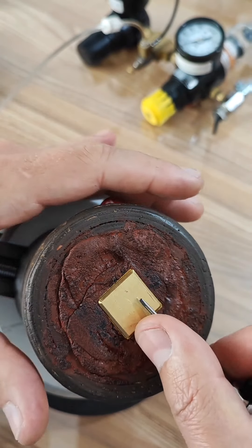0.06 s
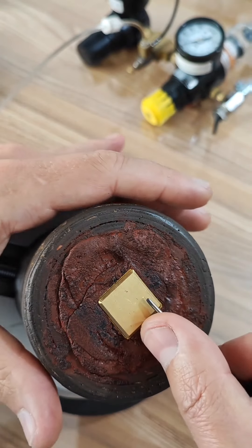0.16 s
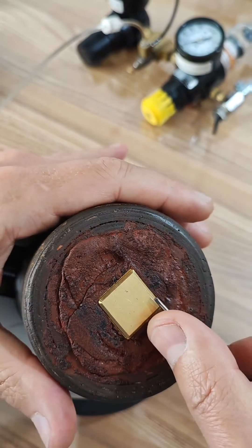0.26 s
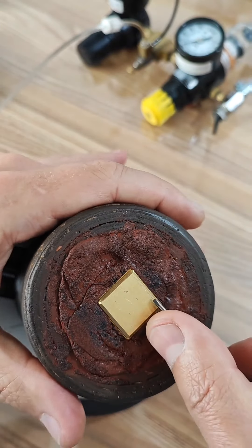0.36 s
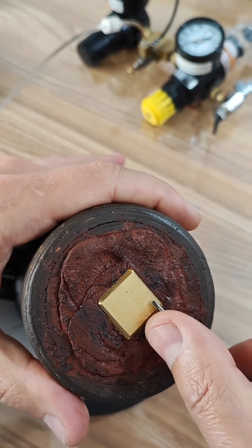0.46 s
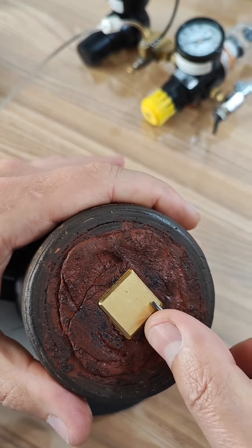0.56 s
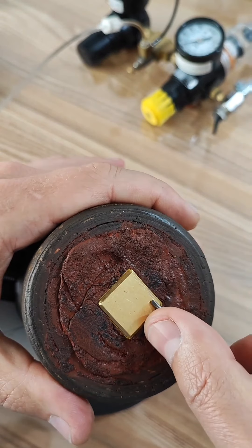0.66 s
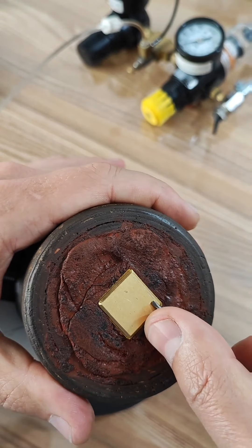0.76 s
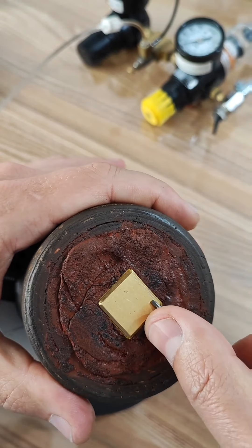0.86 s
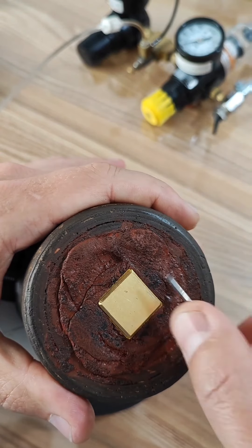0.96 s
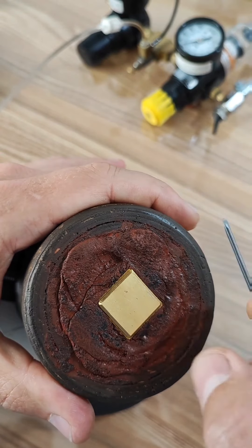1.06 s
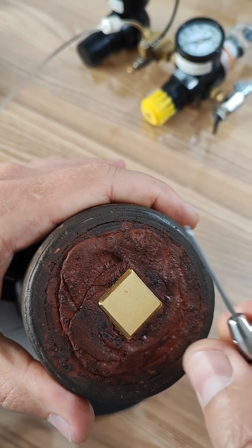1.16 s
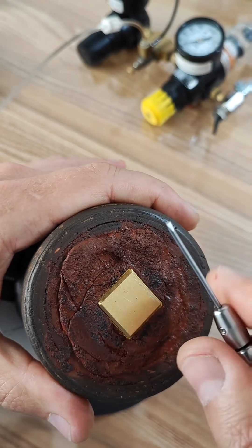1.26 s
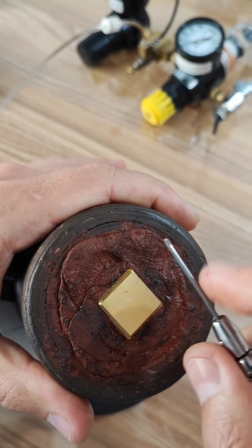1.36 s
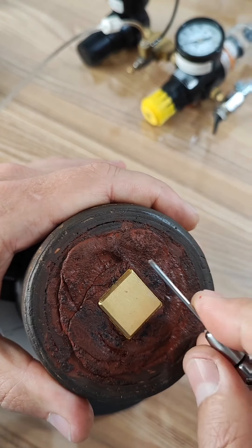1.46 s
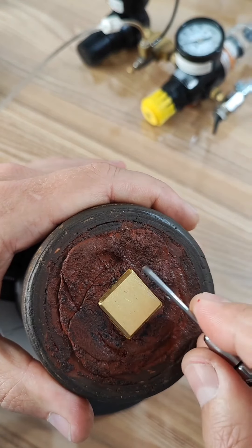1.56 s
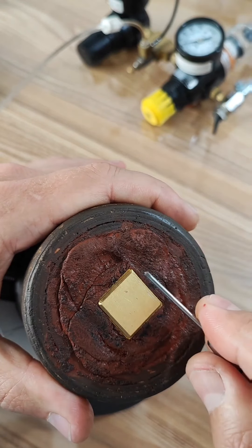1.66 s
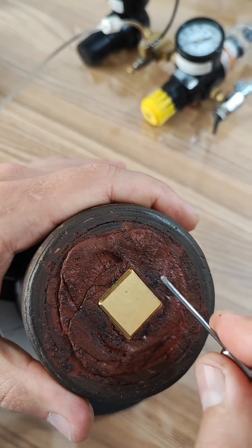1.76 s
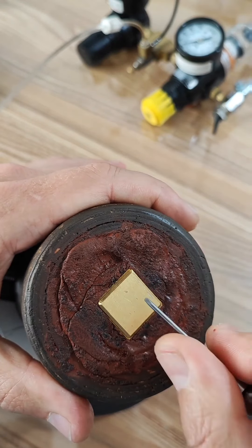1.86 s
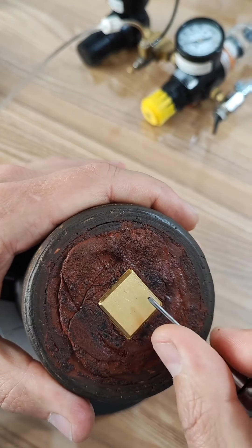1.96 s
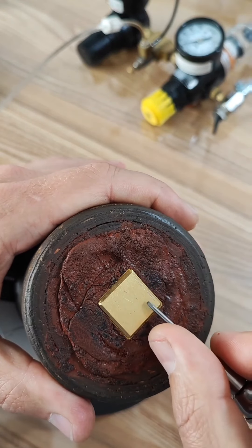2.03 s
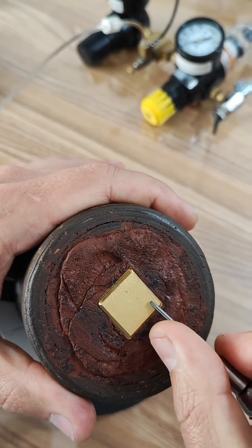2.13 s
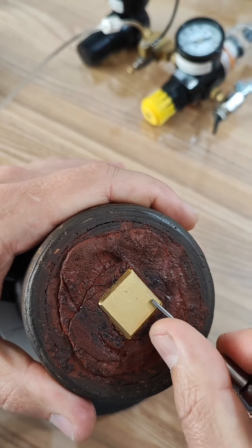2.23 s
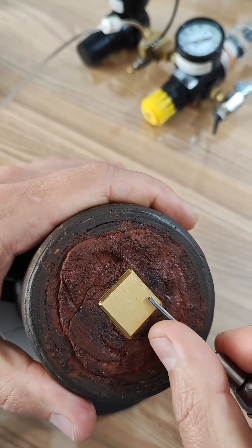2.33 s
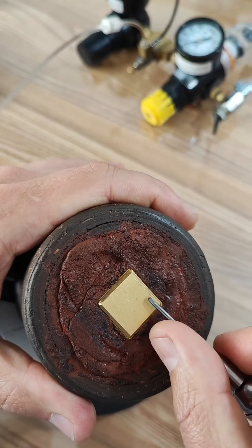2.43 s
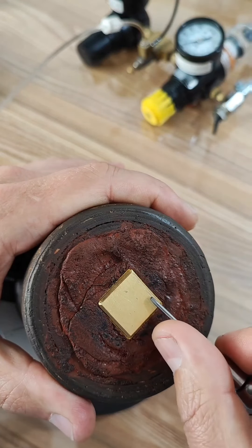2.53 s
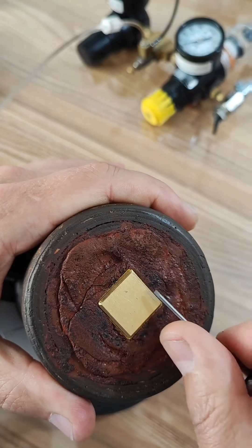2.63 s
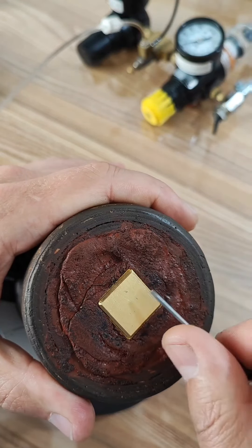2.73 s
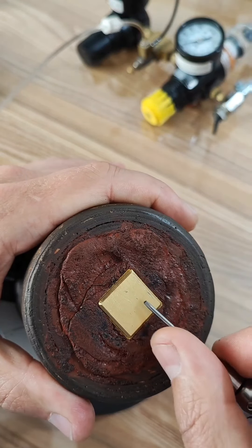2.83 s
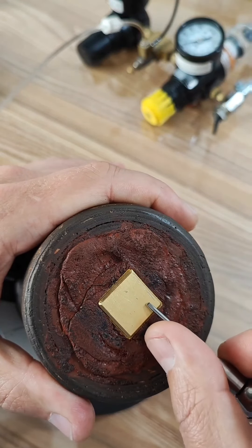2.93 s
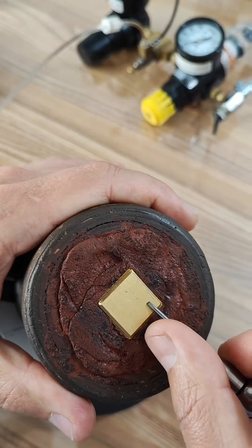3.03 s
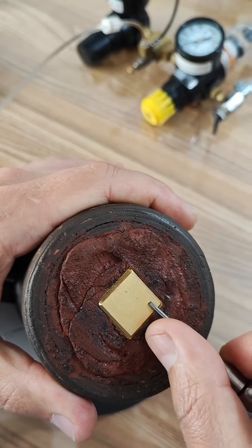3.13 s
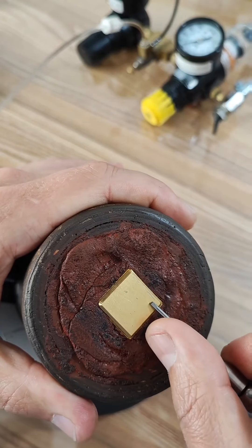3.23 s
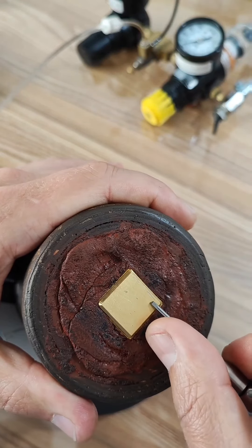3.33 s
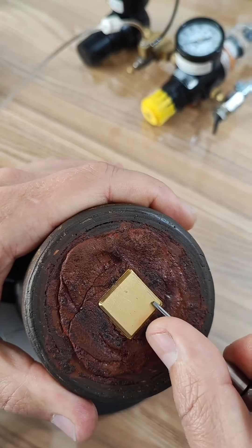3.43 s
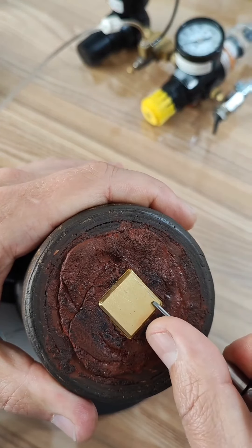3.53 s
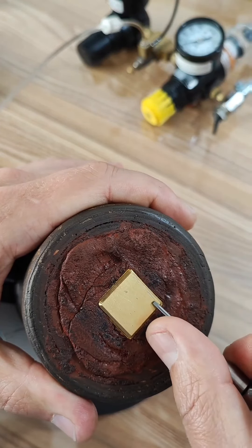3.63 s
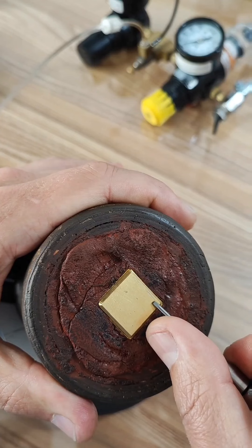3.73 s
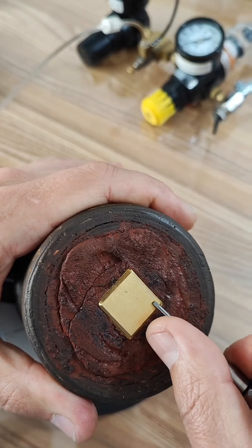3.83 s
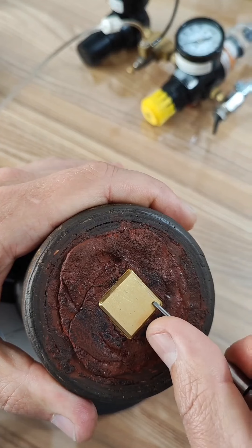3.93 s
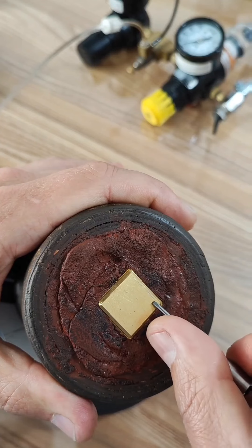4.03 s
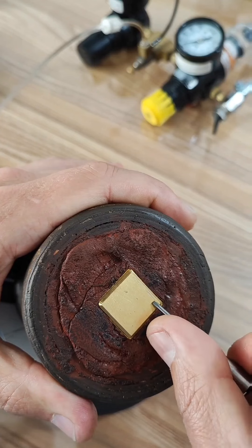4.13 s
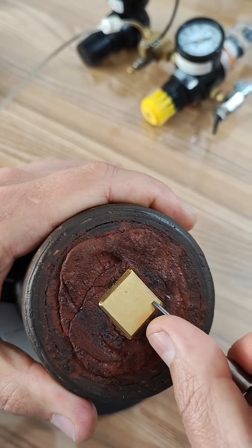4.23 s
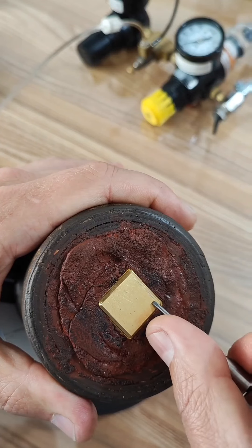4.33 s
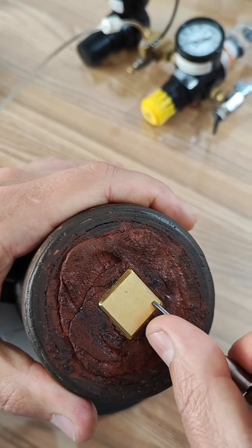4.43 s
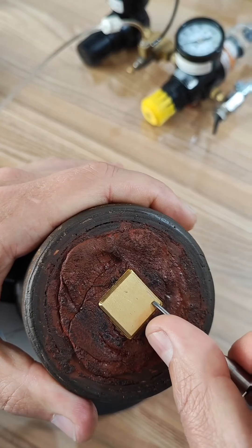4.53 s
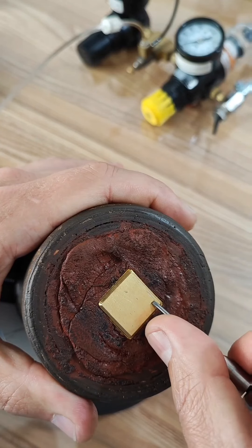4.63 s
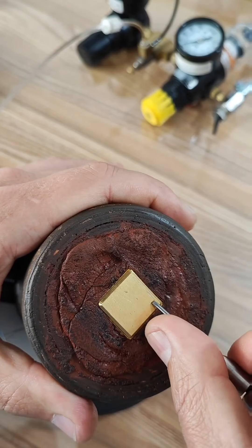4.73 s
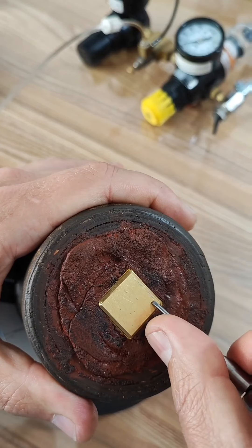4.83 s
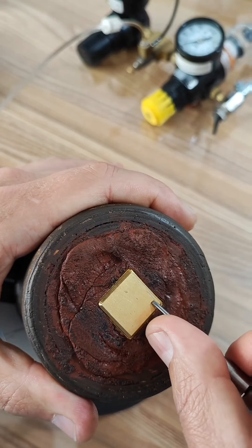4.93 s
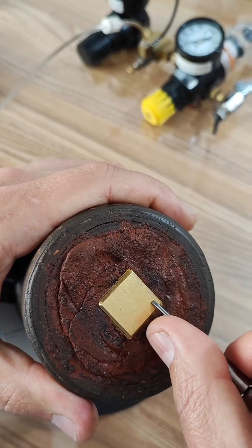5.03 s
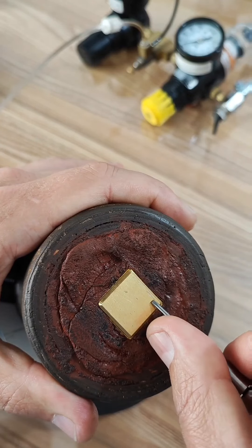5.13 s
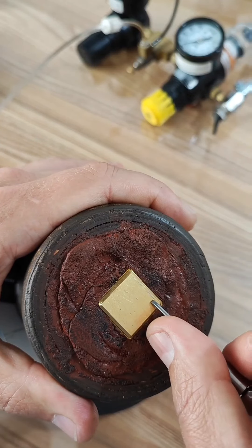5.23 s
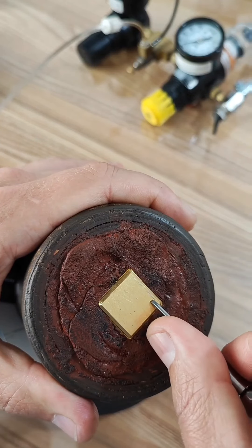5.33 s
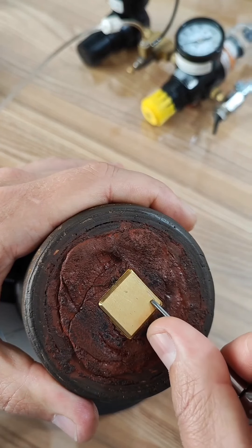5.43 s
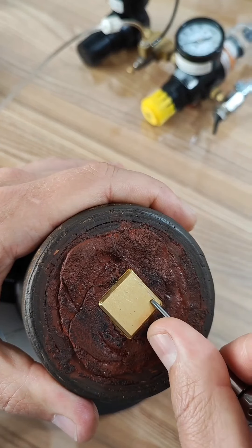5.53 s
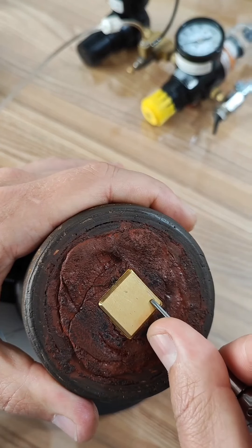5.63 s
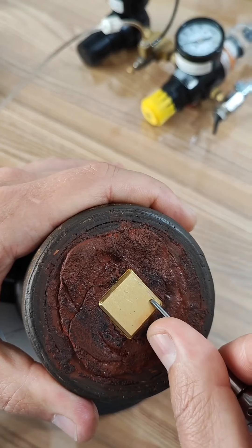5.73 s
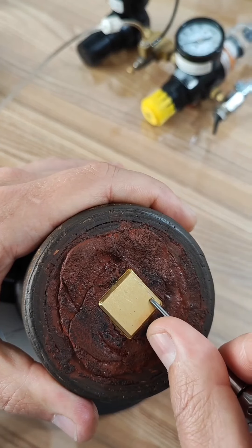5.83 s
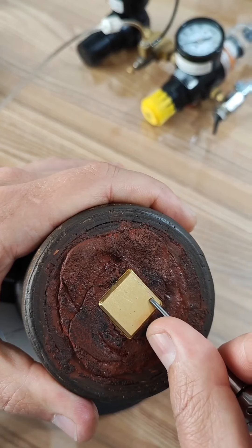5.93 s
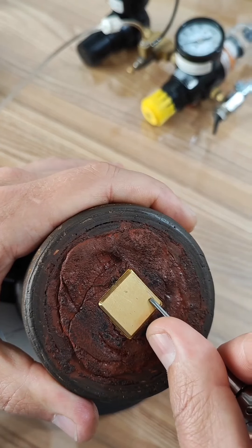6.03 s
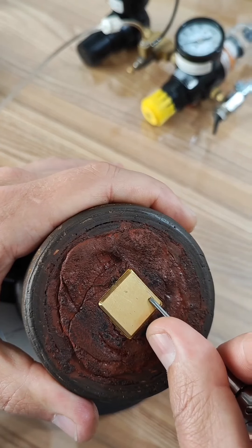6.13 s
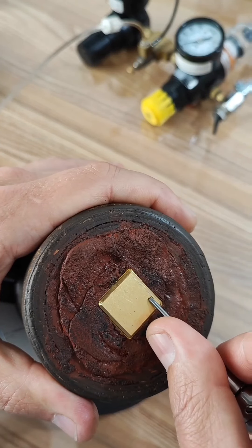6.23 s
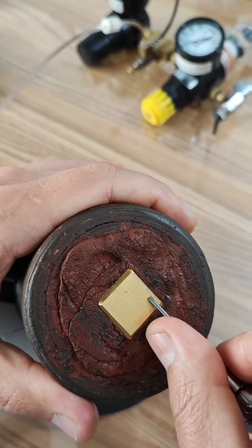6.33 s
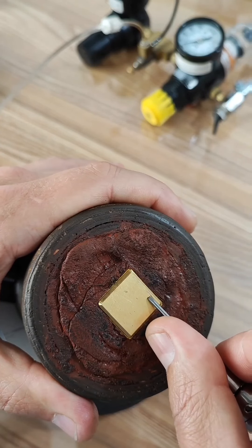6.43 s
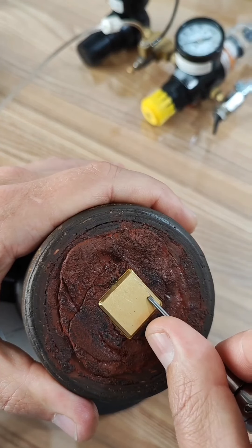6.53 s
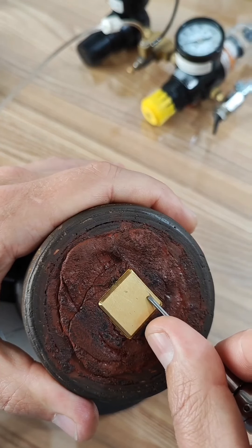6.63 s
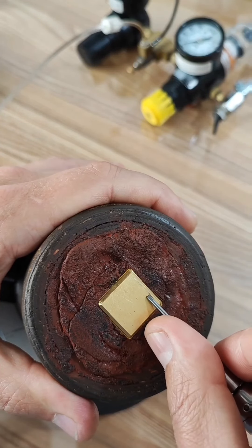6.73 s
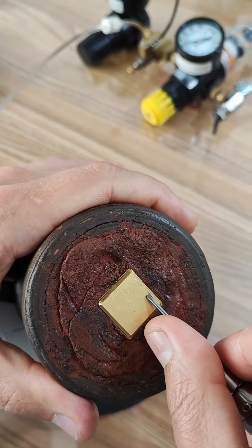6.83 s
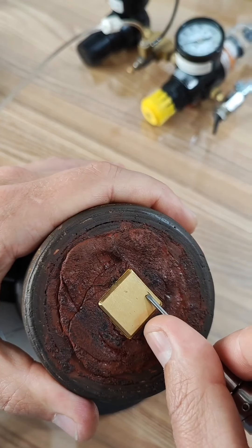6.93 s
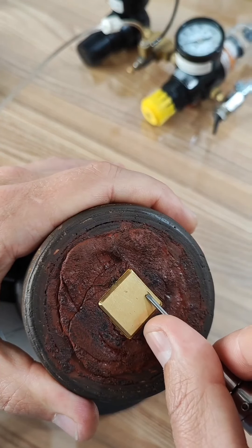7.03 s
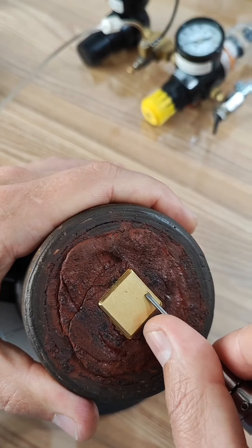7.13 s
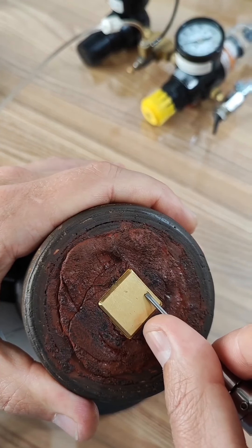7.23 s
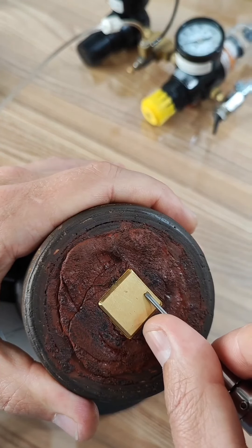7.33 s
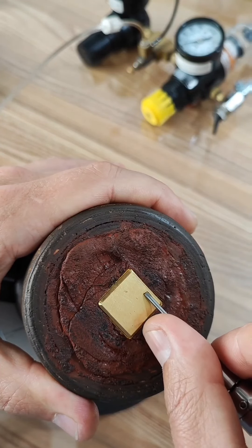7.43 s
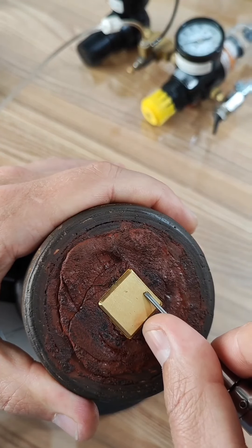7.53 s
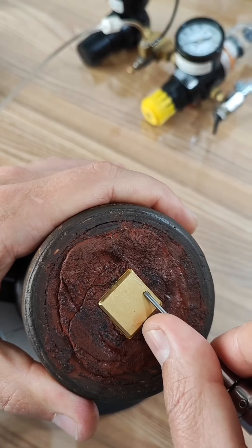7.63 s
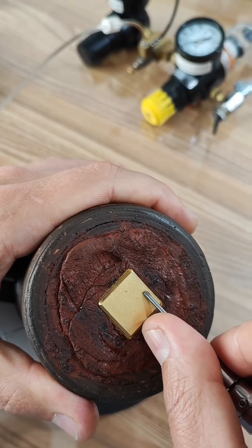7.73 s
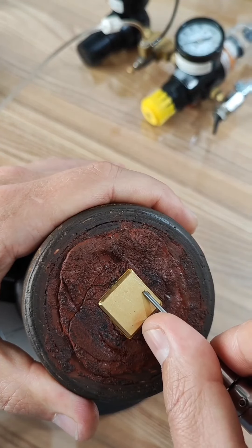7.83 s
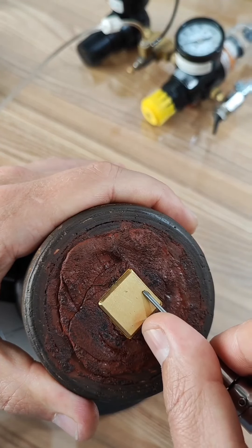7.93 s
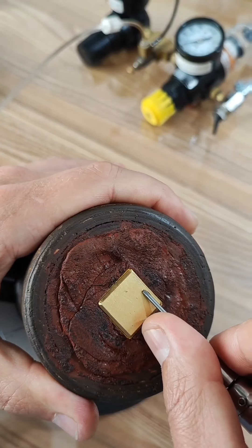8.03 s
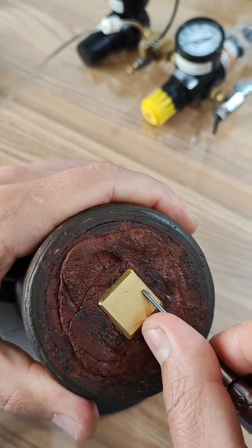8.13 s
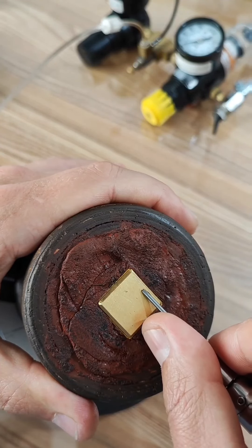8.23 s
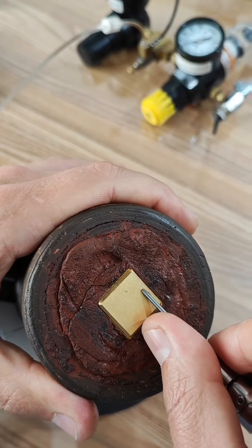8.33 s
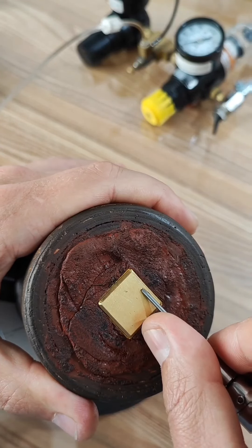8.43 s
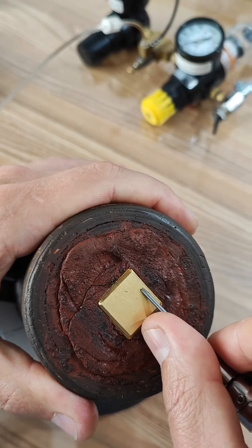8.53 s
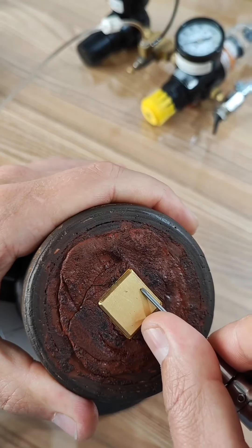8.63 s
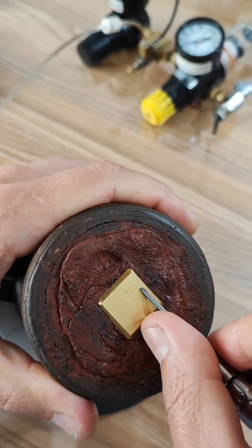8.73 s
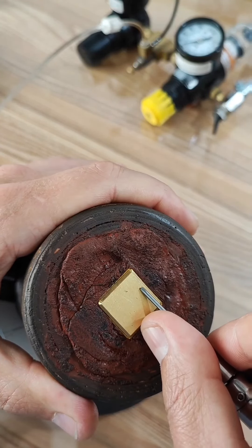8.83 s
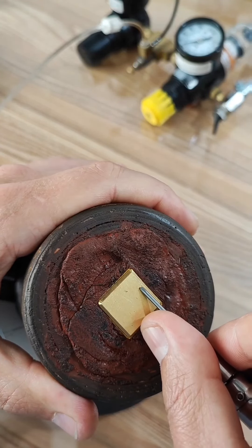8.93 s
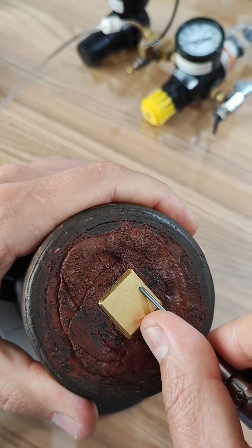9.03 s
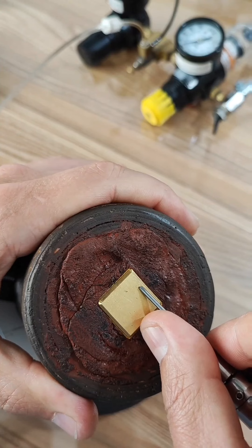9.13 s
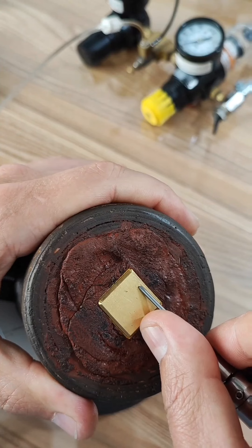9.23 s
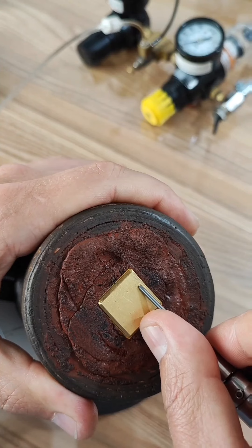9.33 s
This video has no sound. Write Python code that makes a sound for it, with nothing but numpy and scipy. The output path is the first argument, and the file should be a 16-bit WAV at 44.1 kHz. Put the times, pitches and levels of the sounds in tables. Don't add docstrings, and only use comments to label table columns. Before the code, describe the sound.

Close, mostly dry phone stereo: low bench rumble, quiet idling air thumps and steady leak hiss open the scene. A brief harsh burst of piston strokes comes first, then two distant air blasts with workshop echo, the second nearly ending the hiss. After a quiet gap, soft ticking contact with the plate speeds up into loud, ringing, buzzing cutting that rises until the end.

```python
import sys
import numpy as np
from scipy import signal
from scipy.io import wavfile
from scipy.ndimage import uniform_filter1d

SR = 44100
rng = np.random.default_rng(int(sys.argv[2]) if len(sys.argv) > 2 else 0)


def nominal_scale(level):
    x = np.asarray(level, float) / 20
    return 10 ** x


def unload_wav(signal):
    wavfile.write(
        sys.argv[1],
        SR,
        np.round(np.clip(np.atleast_2d(signal).T, -1, 1) * 32767).astype(np.int16),
    )


N = 413216
TIME = np.arange(N) / SR

# time in seconds, stage.
STAGE = [(2.4, 0), (4.0, 1), (4.65, 1.52), (4.85, 1.5), (5.15, 2.15), (6.6, 2), (7.2, 2.5), (7.7, 3)]


def handpiece():
    stage = np.clip(np.interp(TIME, *np.transpose(STAGE)), 0, len(RING_MODES) - 1)
    steel, plate, air = working_strokes(stage)
    ticks, idle_air = idling()
    return struck_metal(stage, steel, plate) + ticks, thump(air + idle_air)


# time in seconds, strokes per second.
PACE = [
    [(1.872, 46.51), (1.971, 47.7), (2.071, 49.31), (2.17, 46.99), (2.27, 35.1)],
    [(4.1267, 34.77), (4.42, 35.55), (4.91, 42.09), (5.1, 49.74), (5.53, 52.98), (5.71, 56.52),
     (6.47, 63.0), (7.12, 75.36), (7.41, 75.73), (8.06, 88.65), (8.57, 84.21), (8.85, 94.12), (9.37, 98.66)],
]
# time in seconds, blow in dB.
FORCE = [
    [(1.872, -51), (1.89, -40), (2.168, -36), (2.264, -43)],
    [(4.127, -66.5), (4.2, -54), (4.5, -50.5), (4.9, -41), (5.12, -34.5), (6.0, -32.5), (7.4, -30),
     (7.85, -28), (9.37, -27.5)],
]
CONTACT_DB = [-19.5, -8, -4, -3.0]
BOOM_DB = [0.27, -0.3, -0.12, 0.2]


def working_strokes(stage):
    steel, plate, air = np.zeros((3, N))
    contact_db = np.interp(stage, np.arange(len(CONTACT_DB)), CONTACT_DB)
    boom_db = np.interp(stage, np.arange(len(BOOM_DB)), BOOM_DB)
    for pace, force in zip(PACE, FORCE):
        rate = np.interp(TIME, *np.transpose(pace))
        blow_db = np.interp(TIME, *np.transpose(force))
        train = strokes(pace, jitter_s=0.00003, spread_db=0.6, wander_s=0.0002)
        scatter = nominal_scale(1.6 * 50 / rate * np.clip(rng.standard_normal(N), -2, 2))
        steel += train * scatter * nominal_scale(blow_db)
        plate += train * nominal_scale(blow_db + contact_db)
        air_db = -37.5 + 9 * np.log2(rate / 50) + 0.23 * blow_db
        air += train * nominal_scale(air_db + boom_db)
    return steel, plate, air


def strokes(pace, jitter_s, spread_db, backward=False, wander_s=0):
    s, rate = np.transpose(pace)
    t = np.arange(s[0], s[-1], 1 / SR)
    count = np.cumsum(np.interp(t, s, rate)) / SR
    whole = np.arange(int(count[-1]) + 1) + backward * (count[-1] % 1)
    jitter, spread, sway = rng.standard_normal((3, len(whole)))
    sway = evened(uniform_filter1d(uniform_filter1d(sway, size=5), size=5))
    at = np.interp(whole, count, t) + jitter_s * jitter + wander_s * sway
    train = np.zeros(N)
    place = np.clip(at * SR, 0, N - 1).astype(int)
    train[place] = nominal_scale(spread_db * spread) * np.sqrt(SR / np.interp(at, s, rate))
    return train


# pitch in Hz, level in dB per Hz.
CRACK_COLOUR = [
    [(1470, -21), (2500, -9), (2970, -3.5), (3920, -5), (5480, 0), (6060, -0.5), (6600, -5), (7530, -2.5),
     (8200, -6), (9960, -8), (12600, -3.5), (14200, -10), (16000, -44)],
    [(1350, -30), (2300, -12.5), (2860, -1), (4060, -9), (4470, -4), (5050, -4), (6550, -6), (7520, -25),
     (8560, -11), (10900, -19), (13600, -10), (14400, -8), (16000, -37)],
    [(1470, -17), (2500, -2.5), (2850, 1), (3460, -8), (3860, -18), (4410, -3.5), (5150, -10), (6500, 0.5),
     (7420, -4.5), (8020, 3.5), (9360, -8.5), (12700, -7), (14200, -21), (16000, -45)],
    [(1470, -26.5), (2500, -7), (2830, -4), (3460, -7.5), (3860, 0), (4580, -5), (5970, -5.5), (6650, -3.5),
     (7650, -9), (9010, -6.5), (12100, -9.5), (13800, -6.5), (14700, -23), (16000, -42)],
]
# pitch in Hz, width in Hz, level in dB, left-right balance in dB,
# lead of the left side in radians.
RING_MODES = [
    [(940, 140, -2.5, 3, -0.14), (1340, 140, 7, 5, -0.76), (1642, 380, 13, 5, -1.2),
     (2450, 300, -3, 2, 0.65)],
    [(775, 200, 7.5, 0, -0.78), (1130, 180, 8.5, 6, -1.1), (1550, 490, 17.5, 2, -0.66),
     (2000, 500, 11, -6, 0.2)],
    [(752, 140, -7.5, 0.5, -1.15), (1167, 205, 1.5, 5, 0.2), (1332.6, 250, -55, 15, -2.9),
     (1630, 95, -8.5, 18, -0.55), (1794, 81, -9, 8, -0.82), (2057, 168, 3, 10.5, -0.71),
     (2276, 150, -2.5, -1.5, -0.81), (880, 120, -13, 1, -1.4)],
    [(896, 44, -14, 5, -1.7), (1137, 210, -0.5, 18, -1.87), (1276.4, 524, 11.5, -1.5, -1.1),
     (1573.5, 120, -17.5, 5, -1.5), (1849, 44, -5.5, 5.5, -1.7), (2013, 127, 4, 13, -0.52),
     (2296, 120, 2, 0, -0.55), (2836, 51, -7, -12, 1)],
]
# pitch in Hz, width in Hz, level in dB, left-right balance in dB,
# lead of the left side in radians.
STEEL_MODES = [
    [(2370, 2700, 21, 1.5, 0), (3480, 170, -5, -25, 0.22), (4870, 500, 16, 3, 0.85),
     (5275, 150, 7, 6, -0.64), (6567, 90, 7, 25, 1.6), (6930, 410, 18, 17.5, 1.7),
     (8600, 360, 12, -19, -0.16), (12400, 500, -6, 9, -1.6)],
    [(3860, 150, 2.5, -8, 0.8), (5130, 340, -5.5, 17.5, 0.2), (6816, 300, 3, 15, 2.2),
     (8400, 420, -9.5, -32.5, 1.4), (9100, 41, -10, -31, 2), (10160, 1330, 9, -5.5, 1.5),
     (12350, 140, 0.5, 11, -1), (13970, 370, -7, 33, 9)],
]


def struck_metal(stage, steel, plate):
    bright = np.zeros((2, N))
    for k, (points, modes) in enumerate(zip(CRACK_COLOUR, RING_MODES)):
        share = np.sqrt(np.maximum(1 - abs(stage - k), 0))
        struck = np.flatnonzero(share * steel)
        span = slice(struck[0] - SR // 20, struck[-1] + SR // 10)
        blows = (share * steel)[span]
        plate_blows = (share ** 2 * plate)[span]
        bright[:, span] += crack(blows, points)
        bright[:, span] += ring(shifted(plate_blows, -0.0007), modes, soft=0.00079)
        bright[:, span] -= nominal_scale(-7) * ring(shifted(blows, -0.0002), STEEL_MODES[k // 2], soft=0.00005)
    return bright


def crack(train, points, rise=0.001, fall=0.0026, back_db=-19, back=0.0061, alike=0.42, grit_db=5.0):
    lead_s = 0.006
    t = np.arange(-lead_s, 0.03, 1 / SR)
    shape = np.exp(np.where(t < 0, t / rise, -t / fall))
    clicks = train + nominal_scale(back_db) * shifted(train, back)
    envelope = signal.oaconvolve(clicks, shape / np.linalg.norm(shape))
    envelope = envelope[round(lead_s * SR):][:len(train)]
    envelope = envelope * evened(nominal_scale(grit_db * rng.standard_normal(len(train))))
    shared, left, right = rng.standard_normal((3, len(train)))
    sides = [alike * shared + np.sqrt(1 - alike ** 2) * own for own in (left, right)]
    return np.array([colour(envelope * x, points, tilt) for x, tilt in zip(sides, (0.5, -0.5))])


def ring(train, modes, soft=0.00084):
    t = np.arange(0, 0.04, 1 / SR)[:, None]
    hz, width, db, pan_db, lead = np.transpose(modes)
    sign = (-1) ** np.cumsum(np.diff(np.log(hz), prepend=0) < 0.2)
    side = np.array([0.5, -0.5])[:, None, None]
    fading = nominal_scale(db + side * pan_db) * np.exp(-np.pi * width * t)
    waves = fading * np.sin(2 * np.pi * hz * t + side * lead)
    onset = (1 - np.exp(-t / soft)) ** 2
    taps = (waves * sign * np.sqrt(width) * onset).sum(axis=2)
    taps = taps / np.linalg.norm(taps.mean(0))
    return signal.oaconvolve(train[None], taps, axes=1)[:, :len(train)]


# time in seconds, strokes per second.
IDLE_PACE = [
    [(0, 32), (.8, 33), (1.3, 34.5), (1.851, 36)],
    [(2.29, 35), (3.2, 33), (3.7, 31.4), (4.097, 31.6)],
]


def idling():
    ticks, air = np.zeros((2, N)), np.zeros(N)
    for pace in IDLE_PACE:
        train = strokes(pace, jitter_s=0.00033, spread_db=2.6, backward=True) * nominal_scale(-59)
        ticks += ring(train * nominal_scale(-28), [(6400, 190, 3, 0, 0), (3140, 400, -3, 0, 0)])
        air += shifted(train, -0.0013)
    return ticks, air


# pitch in Hz, left level in dB, right level in dB.
THUMP = [(45, -26, -27), (72.6, -18.5, -18), (100, -0.5, -3), (111, -10.5, -8), (158, -0.5, -0.5),
         (244, -6, -6.5), (260, -2.5, 4.5), (305, 1, 4.5), (352, 1, 3.5), (401, -7, -4.5), (437, -2, 3.5),
         (539, -12.5, -9.5), (640, -21.5, -15), (764, -7, -24), (1180, -39, -47)]


def thump(train):
    hz, *ports = np.transpose(THUMP)
    early = shifted(train, -0.0015)
    overall = np.sqrt(np.mean(nominal_scale(ports) ** 2))
    sides = []
    for db in ports:
        level = np.sqrt(np.mean(nominal_scale(db) ** 2)) / overall
        sides.append(-level * colour(early, np.c_[hz, db], size=8192))
    return np.array(sides)


# pitch in Hz, level in dB against the blow.
LINGER = [(300, 3.5), (1000, -1), (2200, -1), (3400, 3), (4800, -2), (6700, 2.5), (8800, -11), (10500, 4),
          (12500, 8), (14500, -2)]


def after_ring(bright, low):
    lingering = colour(bright.mean(0), LINGER) + nominal_scale(-14) * low.mean(0)
    return patchy(workshop(lingering, first=120), depth_db=42.0, above_hz=2600)


def patchy(x, depth_db, above_hz):
    hz, t, z = signal.stft(x, SR, nperseg=256, noverlap=128)
    field = uniform_filter1d(rng.standard_normal(z.shape), size=7, axis=1)
    field = evened(uniform_filter1d(field, size=3, axis=2))
    drop_db = depth_db * np.clip(field - 0.3, 0, 2) * (hz > above_hz)[:, None]
    return signal.istft(z * nominal_scale(-drop_db), SR, nperseg=256, noverlap=128)[1][:, :N]


# start in seconds, level in dB, rise in seconds, length in seconds,
# lead-in level in dB.
VENTS = [
    (2.407, -35.5, 0.0016, 0.047, -46),
    (2.788, -33.5, 0.0015, 0.064, -15.5),
]
# pitch in Hz, level in dB per Hz.
VENT_COLOUR = [
    [(180, -35), (300, -20), (581, -16), (674, -1), (769, -11.5), (2040, -10.5), (2520, -6.5), (5210, -1),
     (6360, 3), (8140, -13.5), (12900, -4), (14300, -17), (15500, -82)],
    [(120, -37), (200, -32), (392, -12), (890, -18.5), (1150, -0.5), (1780, -11), (2020, -3), (3420, -9.5),
     (6710, -8), (7620, -17), (13600, -19.5), (14400, -32), (15500, -92)],
]


def vents():
    out = np.zeros(N)
    for (s, db, rise, length, lead_db), points in zip(VENTS, VENT_COLOUR):
        t = TIME - s
        blast = np.where(t > 0, (1 - np.exp(-abs(t) / rise)) * np.exp(-abs(t) / length), 0)
        lead = nominal_scale(lead_db) * np.exp(-abs(t) / 0.031)
        out += colour(nominal_scale(db) * (blast + lead) * rng.standard_normal(N), points)
    return out


# pitch in Hz, seconds to die away by 60 dB.
WORKSHOP = [(250, 2), (660, 0.54), (1740, 0.57), (4590, 0.51), (12100, 0.14)]


def workshop(x, first):
    taps = np.zeros((2, SR))
    at = np.arange(first, SR - 20, 20)
    at = at + rng.integers(0, 20, (2, len(at)))
    np.put_along_axis(taps, at, rng.choice([-1., 1.], at.shape), 1)
    hz, t, z = signal.stft(taps, SR, nperseg=256)
    dying = nominal_scale(-60 * t / read(WORKSHOP, hz)[:, None])
    tail = signal.istft(z * dying, SR, nperseg=256)[1]
    return signal.fftconvolve(x[None], tail / np.linalg.norm(tail[0]), axes=1)[:, :N]


# multiple of the pump's speed, level in dB.
PUMP = [(1, -77), (4, -81), (5, -72), (6, -128), (7, -67.5), (8, -67.5), (9, -69), (10, -68.5), (11, -77),
        (12, -76.5), (13, -107), (14, -73), (15, -77), (16, -76), (17, -75.5), (18, -79)]
# pitch in Hz, level in dB.
HUM = [(54, -98), (97, -71.5), (136, -73), (199.5, -70)]


def pump():
    pump_hz = 38.08
    drift = evened(uniform_filter1d(uniform_filter1d(rng.standard_normal(N), 9000), 9000))
    turn = 2 * np.pi * np.cumsum(pump_hz * (1 + 0.00171 * drift)) / SR
    putter = sum(nominal_scale(db) * np.cos(k * turn + 0.73 * rng.standard_normal()) for k, db in PUMP)
    lines = sum(nominal_scale(db) * np.cos(turn * hz / pump_hz + 6 * rng.random()) for hz, db in HUM)
    return np.sqrt(2) * (putter + lines) * nominal_scale([[-1], [1]])


# pitch in Hz, level in dB per Hz.
LEAK = [(530, -19), (900, 0), (932, -12), (1050, -2), (1130, -13), (1600, -15), (2190, -8), (3430, -5),
        (3720, -8.5), (5440, 0.5), (6690, -1.5), (7510, -13.5), (11000, -11.5), (12300, -9), (14200, -10)]
# pitch in Hz, level in dB.
WHISTLES = [(2250, -87), (2885, -87), (3085, -84.5), (3424, -86), (5475, -81.5), (6648, -86), (11025, -86),
            (12979, -107)]


def air_leak():
    waver = rng.standard_normal((len(WHISTLES), N // 64 + 1))
    waver = evened(uniform_filter1d(waver, 40, axis=1))
    whistles = np.zeros(N)
    for (hz, db), w in zip(WHISTLES, waver):
        turn = np.cumsum(hz * (1 + 0.00122 * np.repeat(w, 64)[:N])) / SR
        whistles += nominal_scale(db + 66.5) * np.cos(2 * np.pi * turn)
    shut_s, shut_takes_s = 2.6, 0.18
    leak_db = np.interp(TIME, [shut_s, shut_s + shut_takes_s], [-59, -77])
    return (noise(LEAK, patchy_db=2.8, tilt=2.0) + whistles) * nominal_scale(leak_db)


# time in seconds, level in dB, length in seconds.
RUMBLE = [
    (1.13, -61, 0.14),
    (1.5, -66, 0.42),
    (2.1, -70, 0.12),
    (4.2, -67, .6),
]


def hand_rumble():
    points = [(15, -34), (35, -2), (60, 3), (95, -8), (160, -29), (400, -85)]  # Hz, dB per Hz
    rumble = colour(rng.standard_normal(N), points, size=8192)
    hands = nominal_scale(-72) + sum(nominal_scale(db) * np.exp(-((TIME - s) / length) ** 2) for s, db, length in RUMBLE)
    return rumble * hands


# pitch in Hz, level in dB per Hz.
FLOOR = [(12, -32), (20, 12), (84, -7), (189, 6), (229, -22.5), (319, -12.5), (656, -2), (1080, -10.5),
         (4200, -22), (6530, -33), (10200, -24), (13100, -45), (15000, -45)]


def room_floor():
    return nominal_scale(-64) * noise(FLOOR, patchy_db=1.9)


# pitch in Hz, likeness from -1 to 1.
SAME = [(60, 0.32), (180, 0.33), (550, -0.43), (1650, -0.0085), (4970, -0.2), (15000, -0.12)]


def noise(points, patchy_db, tilt=0):
    frames, hz = N // 256 + 5, np.fft.rfftfreq(1024, 1 / SR)
    a, b, c, d, patches = rng.standard_normal((frames, 513, 5)).T
    patches = evened(uniform_filter1d(uniform_filter1d(patches, 12, 0), 14, 1))
    same = np.clip(read(SAME, hz), -1, 1)[:, None]
    left = a + 1j * b
    right = same * left + np.sqrt(1 - same ** 2) * (c + 1j * d)
    z = np.array([left, right]) * nominal_scale(read(points, hz)[:, None] + patchy_db * patches)
    return evened(signal.istft(z, nperseg=1024, noverlap=768)[1][:, :N]) * nominal_scale([[tilt], [-tilt]])


# pitch in Hz, left-right balance in dB.
PORTS = [(60, -1.5), (110, 4), (200, 1), (380, 6), (700, 19.5), (1290, -8), (2380, 1), (4400, -2.5),
         (8120, -3), (15000, 12.5)]


def colour(x, points, tilt=0, size=4096):
    hz = abs(np.fft.fftfreq(size, 1 / SR))
    log_gain = np.log(nominal_scale(np.maximum(read(points, hz), -90) + tilt * read(PORTS, hz)))
    taps = np.fft.ifft(np.exp(np.conj(signal.hilbert(log_gain)))).real[:size // 2]
    flat = np.sqrt(np.mean(nominal_scale(read(points, hz)) ** 2))
    return signal.oaconvolve(x, taps / flat)[:len(x)]


def read(points, hz):
    f, value = np.transpose(points)
    return np.interp(np.log(hz + 1), np.log(f + 1), value)


def evened(x):
    return x / np.sqrt(np.mean(x ** 2) + 1e-20)


def shifted(x, s):
    at = np.arange(len(x))
    return np.interp(at - round(s * SR), at, x, 0, 0)


def scene():
    bright, low = handpiece()
    near = bright + low + nominal_scale(-5.5) * after_ring(bright, low)
    valve = vents()
    far = nominal_scale(2.0) * valve + nominal_scale(3.5) * workshop(valve, first=100)
    return near + far + pump() + air_leak() + hand_rumble() + room_floor()


def low_pass(x):
    return signal.sosfilt(signal.butter(12, 16480, fs=SR, output="sos"), x)


def record(dry):
    top = signal.butter(10, 14300, fs=SR, output="sos")
    mix = signal.sosfilt(top, dry)
    return low_pass(mix)


dry = scene()
out = record(dry)
unload_wav(out)
```